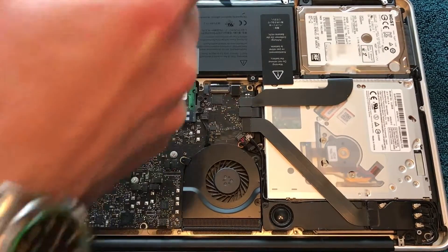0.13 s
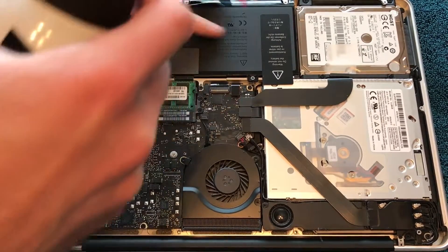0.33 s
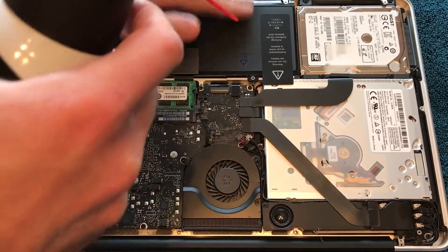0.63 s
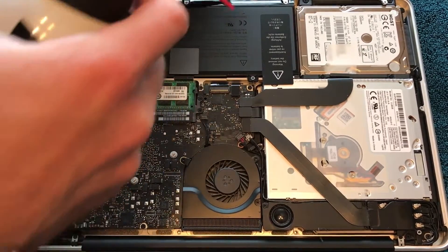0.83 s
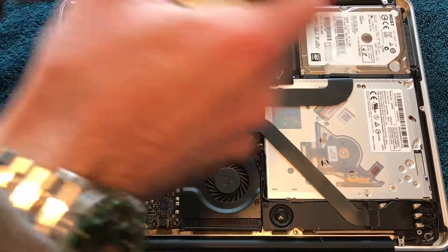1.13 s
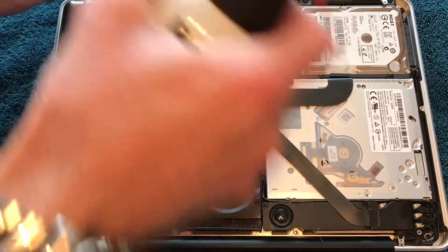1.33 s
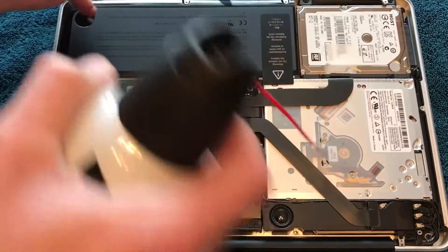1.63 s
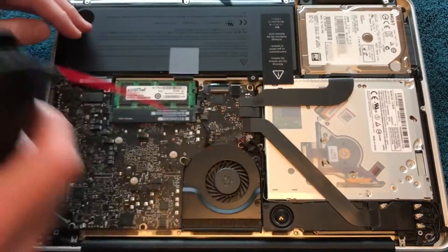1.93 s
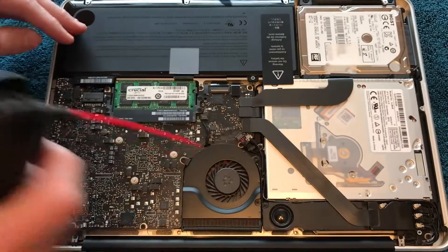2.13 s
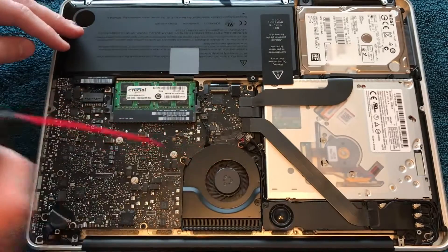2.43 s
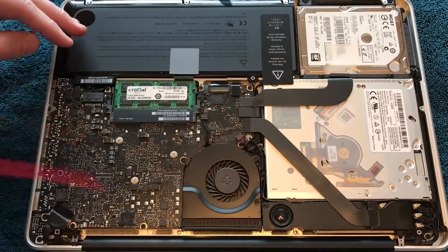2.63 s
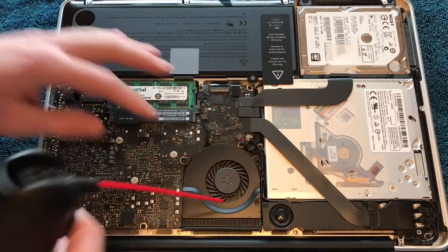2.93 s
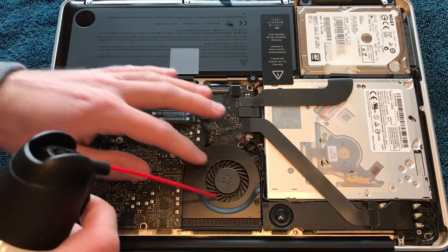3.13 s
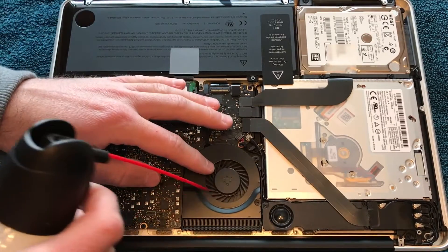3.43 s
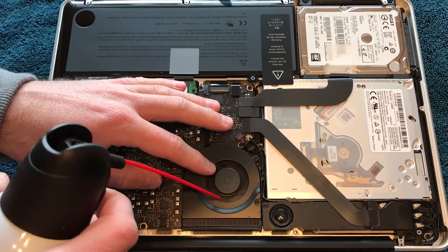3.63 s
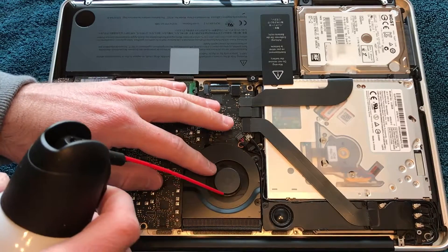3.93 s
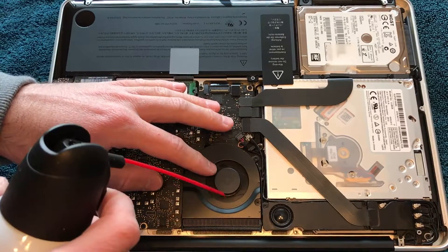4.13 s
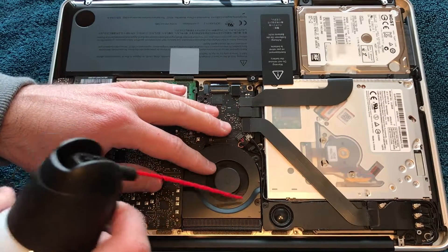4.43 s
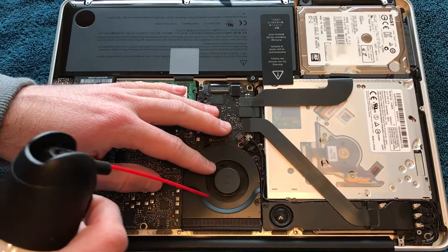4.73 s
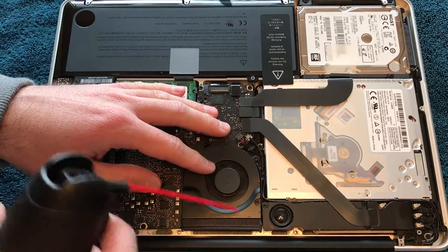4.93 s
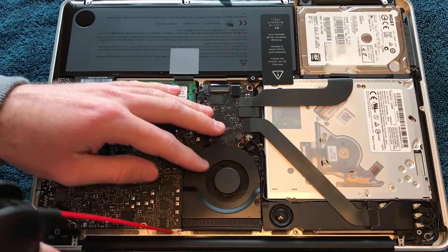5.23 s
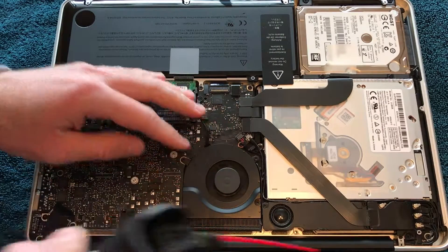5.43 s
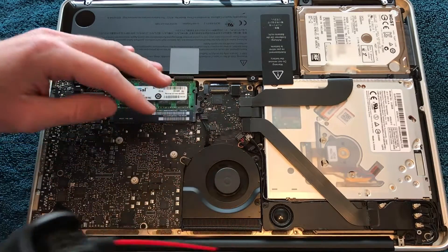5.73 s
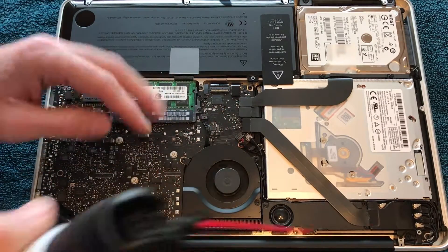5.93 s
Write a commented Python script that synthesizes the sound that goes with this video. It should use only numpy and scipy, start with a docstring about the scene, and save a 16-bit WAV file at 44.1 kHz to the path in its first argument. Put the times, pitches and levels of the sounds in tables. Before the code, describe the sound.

Close mono sound in a quiet room with short, faint echoes. The end of a compressed-air blast cuts off by 0.15 s, leaving low rumble, hum and faint hiss, with a tiny low pop near 0.9 and faint ticks just before 1. From about 1.05 to 2.7 s a rough spray sweeps over an open laptop, its hiss fluttering between hollow roar, splashy edges and high fizz, with quick flaring puffs, brightest around 2.4. After a pause, a smoother, sharper blast runs from 3.2 to 4.25; a short falling chirp comes near 3.5, then a fan whine climbs steeply from 3.6 to 4.2, with tiny pops around 4. A strong short burst at 4.53-4.94 brings back a buzzy, lower whine that dips and rises slightly. The last spray hits at 5.15, weakens around 5.4-5.6, swells again near 5.8 and stops just before 6.

```python
"""Canned air hisses from the tip of a thin straw over an open laptop, close to a mono microphone in a quiet room.
The jet and what it strikes are noise of different colours: low roar in hollows, splash on edges, high fizz.
Flares are puffs of resonant noise, spent air is low lumpy noise, and blips are short falling tones.
Aimed at the fan, the jet spins the blades up into a whine, built from multiples of the blade rate.
Random taps make the room's echo; a low rumble, a hum and a faint hiss remain between blasts."""
import sys
import numpy as np
from scipy import signal
from scipy.io import wavfile
from scipy.ndimage import uniform_filter1d

SR = 44100
rng = np.random.default_rng(int(sys.argv[2]) if len(sys.argv) > 2 else 0)


def digitize_waveform(pressure):
    """Quantize a signal to 16-bit integers and store it at the path in sys.argv[1].

    Rows of a 2-D input are taken as channels; values are limited to [-1, 1].
    """
    field = np.atleast_2d(pressure).T
    bounded = np.clip(field, -1, 1)
    quanta = np.round(bounded * 32767).astype(np.int16)
    wavfile.write(sys.argv[1], SR, quanta)


N = 268039  # length of the sound in samples


def gain_of(db):
    """Turns decibels into a factor for the wave's height."""
    return 10 ** (np.asarray(db) / 20)


def evened(x):
    """Scales a signal to an average (RMS) strength of 1."""
    return x / np.sqrt(np.mean(x ** 2) + 1e-20)


def value_at(points, hz):
    """Reads a table of (pitch, value) at any pitch, with pitch spaced as the ear hears it."""
    pitch_hz, value = np.transpose(points)
    return np.interp(np.log(hz + 1), np.log(pitch_hz + 1), value)


def add(mix, start_s, sound):
    """Adds a short sound to the mix at its start time."""
    part = mix[round(start_s * SR):][:len(sound)]
    part += sound[:len(part)]


def columns(tables):
    """Joins timed tables into smooth curves; also returns a gate that is shut away from every table."""
    t = np.arange(N) / SR
    time_s, *rest = np.transpose(np.concatenate(tables))
    inside = [(t >= rows[0][0] - .005) & (t <= rows[-1][0] + .005) for rows in tables]
    is_open = sum(inside) > 0
    gate = uniform_filter1d(is_open * 1., size=200)
    return [np.interp(t, time_s, column) for column in rest], gate


def resonate(x, hz, width_hz):
    """A resonance of gain 1: shifts the pitch hz down to zero, smooths, and shifts back up."""
    turn = np.exp(2j * np.pi * np.cumsum(hz * np.ones(len(x))) / SR)
    memory = np.exp(-np.pi * width_hz / SR)
    smooth = signal.lfilter([1 - memory], [1, -memory], x / turn)
    return 2 * (turn * smooth).real


def noise(colour, patchy_db, flicker_db, size=512):
    """Turbulence: random short-time spectra with drifting patches and a flicker shared by all pitches."""
    frames = 4 * N // size + 5
    hz = np.fft.rfftfreq(size, 1 / SR)
    a, b, patches = rng.standard_normal((frames, len(hz), 3)).T
    patches = uniform_filter1d(patches, size=6, axis=0)  # smooth over pitch
    patches = evened(uniform_filter1d(patches, size=14, axis=1))  # smooth over time
    flicker = evened(uniform_filter1d(rng.standard_normal(frames), size=3))
    level_db = value_at(colour, hz)[:, None]
    z = (a + 1j * b) * gain_of(level_db + patchy_db * patches + flicker_db * flicker)
    wave = signal.istft(z, nperseg=size, noverlap=3 * size // 4)[1]
    return evened(wave[:N])


def humps(rows, roundness):
    """Adds up the power of rounded swells; returns one gain curve for each level column."""
    start_s, length_s, peak, *levels_db = np.transpose(rows)[:, :, None]
    t = np.arange(0, N, 32) / SR
    peak = np.clip(peak, .1, .9)
    u = (t - start_s) / length_s  # 0 at the start of a swell, 1 at its end
    climb = np.clip(np.minimum(u / peak, (1 - u) / (1 - peak)), 0, 1)
    softness = roundness + 1.4 * length_s  # slower swells have softer edges
    shape = np.sin(np.pi / 2 * climb) ** softness
    power = (gain_of(levels_db) ** 2 * shape ** 2).sum(axis=1)
    return [np.interp(np.arange(N) / SR, t, np.sqrt(p)) for p in power]


def jet():
    """Turbulent air is noise: the free jet at the straw tip and three kinds of surface that it strikes."""
    # colour of the hiss at the tip, the roar in hollows, the splash on edges and the fizz:
    # pitch_hz [Hz], level_db [dB per Hz, relative]
    tip_colour = [(4120, -37.5), (7000, -13.5), (7620, -12.5), (9380, -2.5), (10500, -4), (12700, 0.5),
                  (13700, -2), (15100, 0), (15800, -10.5)]
    hollow_colour = [(60, -79), (250, -37), (550, -22.5), (1000, -6), (1700, 0), (2300, -1.5), (3200, -12)]
    edge_colour = [(500, -63), (1500, -35), (2300, -3), (3000, 0.5), (4000, 0), (5000, -0.5), (6500, -15)]
    fizz_colour = [(1500, -73.5), (3800, -8.5), (5000, -5), (5800, -4.5), (6800, -4.5), (7700, -10.5),
                   (9000, -8.5), (10300, -24.5), (12000, -34.5)]
    # hiss at the straw tip, one table for each press of the trigger: time_s [s], level_db [dB]
    tip_level = [
        [(0.0, -28.5), (0.04, -30), (0.114, -31), (0.148, -59), (0.16, -55)],
        [(0.99, -73), (1.018, -62), (1.062, -45.5), (1.086, -28.5), (1.126, -27), (1.344, -31), (1.374, -25.5),
         (1.428, -34), (1.486, -34), (1.544, -34), (1.638, -26), (1.74, -42), (1.984, -24), (1.998, -28.5),
         (2.106, -25), (2.242, -29), (2.408, -31), (2.506, -30), (2.7, -27), (2.74, -52)],
        [(3.14, -87), (3.154, -71.5), (3.238, -34), (3.294, -35), (3.35, -27.5), (3.526, -22.5), (3.532, -24),
         (3.9, -23.5), (4.058, -23), (4.202, -23.5), (4.25, -55)],
        [(4.47, -65.5), (4.534, -37.5), (4.544, -30), (4.604, -18.5), (4.708, -22), (4.75, -26), (4.86, -22),
         (4.91, -24), (4.938, -46), (4.96, -69)],
        [(5.08, -62), (5.15, -35.5), (5.164, -20.5), (5.186, -17), (5.246, -19.5), (5.32, -19), (5.364, -34),
         (5.496, -44.5), (5.602, -38), (5.696, -24.5), (5.804, -20), (5.862, -27), (5.98, -86)],
    ]
    # what the jet keeps hitting, one row for each press:
    # roar_db, splash_db, fizz_db [dB against the tip hiss]
    aim = [(0.5, -1.5, -2), (-11, -12.5, -6.5), (-18.5, -8, -6), (-24.5, -13, -5), (-26.5, -20, -11)]
    # the straw sweeps over a part of the board: start_s [s], length_s [s],
    # peak_place [0-1 of the length, held to 0.1-0.9], roar_db, splash_db, fizz_db [dB]
    sweeps = [(1.11, 0.041, 0.4, -29.5, -29.5, -29.5), (1.145, .07, 0.6, -37, -50, -28),
              (1.18, 0.11, 0.48, -23, -26.5, -39), (1.24, 0.089, .5, -32, -47, -28.5),
              (1.31, .06, .5, -30.5, -34, -26), (1.34, 0.098, 0.5, -24, -29.5, -37),
              (1.415, 0.12, 0.56, -23, -25.5, -35), (1.5, .09, 0.4, -28, -41, -39.5),
              (1.56, 0.1, 0.27, -20, -27, -30), (1.62, 0.17, 0.3, -21, -24, -35),
              (1.75, 0.089, 0.8, -20, -22.5, -49), (1.83, 0.062, .5, -24.5, -29, -29.5),
              (1.89, 0.13, 0.26, -28, -22.5, -34), (2.01, 0.099, .4, -29, -21, -27),
              (2.06, 0.15, 0.26, -23, -29, -31), (2.13, 0.11, 0.76, -27.5, -21.5, -29),
              (2.22, .09, .5, -30.5, -33.5, -29), (2.295, 0.079, 0.72, -27.5, -15, -26),
              (2.35, 0.095, 0.6, -26.5, -15, -19.5), (2.415, 0.068, .7, -27, -16, -35),
              (2.46, 0.068, 0.4, -31, -27, -32), (2.53, 0.22, 0, -56, -31.5, -37),
              (3.17, 0.23, 0.38, -60.5, -44, -42), (3.3, 0.22, 0.62, -39.5, -29.5, -32.5),
              (3.57, 0.41, 0.23, -32.5, -35, -47), (3.85, 0.41, 0.65, -43.5, -70, -32),
              (4.53, 0.33, 0.44, -40.5, -29.5, -35), (4.75, 0.2, 0.24, -41, -36, -30.5),
              (5.095, 0.086, 0.7, -56, -49.5, -45), (5.13, 0.1, 0.24, -67, -56, -38),
              (5.27, 0.13, 0.43, -34.5, -29.5, -27), (5.33, 0.14, 0.43, -36, -30, -49),
              (5.38, 0.28, 0, -37, -44.5, -57), (5.5, 0.23, 0.78, -34, -38.5, -47),
              (5.6, .19, .5, -37, -26, -32.5), (5.78, .13, 0.71, -35.5, -30, -49)]

    (tip_db,), gate = columns(tip_level)
    later_starts_s = [rows[0][0] for rows in tip_level[1:]]
    press = np.searchsorted(later_starts_s, np.arange(N) / SR)
    steady = gain_of(tip_db + np.array(aim)[press].T)
    # a lower roundness would make the sweeps flatter with quicker edges
    roar, splash, fizz = np.hypot(steady, humps(sweeps, roundness=0.59))
    out = gain_of(tip_db) * noise(tip_colour, patchy_db=2.16, flicker_db=1.0)
    out += roar * noise(hollow_colour, patchy_db=1.3, flicker_db=.8)
    out += splash * noise(edge_colour, patchy_db=1.1, flicker_db=.7)
    out += fizz * noise(fizz_colour, patchy_db=2.0, flicker_db=0.9)
    return gate * out


def flares():
    """The jet crosses an edge or hole and flares: a puff of noise through a steep resonance."""
    # start_s [s], level_db [dB at the height of the puff], pitch_hz [Hz],
    # width_hz [Hz, of each of three passes], rise_s [s]
    flare_rows = [(0.0, -34, 1290, 600, .022), (0.029, -33.5, 3320, 700, .02),
                  (1.001, -64.5, 4100, 1100, 0.03), (1.081, -62.5, 2550, 1510, 0.006),
                  (1.127, -28, 1760, 900, 0.0087), (1.154, -21, 6130, 900, 0.0031),
                  (1.18, -25, 6000, 900, 0.0088), (1.329, -24.5, 6300, 700, 0.012),
                  (1.386, -18, 2100, 930, 0.0089), (1.574, -24, 4150, 500, 0.018),
                  (1.599, -26, 11400, 2200, 0.027), (1.64, -25.5, 4180, 500, 0.023),
                  (1.68, -18.5, 1690, 603, 0.011), (1.81, -23.5, 1584, 695, 0.011),
                  (1.862, -26.5, 14000, 2500, 0.01), (2.08, -22, 10900, 2495, 0.021),
                  (2.118, -42, 713, 494, 0.01), (2.24, -29, 2500, 697, .015),
                  (2.339, -17.5, 3110, 897, 0.0092), (2.385, -15.5, 5320, 701, 0.012),
                  (2.446, -18.5, 2620, 890, 0.014), (3.485, -44.5, 3370, 1500, 0.0053),
                  (4.543, -27, 5950, 2000, 0.016), (5.168, -32, 6140, 720, 0.017),
                  (5.331, -32.5, 3950, 402, 0.021), (5.314, -25.5, 5720, 1200, 0.02),
                  (5.6, -42, 870, 503, .05), (5.68, -28.5, 5350, 1500, 0.028)]
    out = np.zeros(N)
    puffs = rng.standard_normal((len(flare_rows), SR // 4))
    for (start_s, level_db, pitch_hz, width_hz, rise_s), puff in zip(flare_rows, puffs):
        u = np.arange(len(puff)) / SR / rise_s
        for _ in range(3):
            puff = resonate(puff, pitch_hz, width_hz)
        swell = u * np.exp(1 - u)  # reaches 1 after the rise time, then dies away
        add(out, start_s, gain_of(level_db) * evened(puff) * swell)
    return out


def buffet():
    """Spent air buffets across the case: low lumpy noise in gusts."""
    # start_s [s], length_s [s], peak_place [0-1 of the length, held to 0.1-0.9], level_db [dB]
    gusts = [(-.1, .25, 0.7, -47.5), (1.06, 0.2, 0.45, -46), (1.255, 0.11, 0.34, -45.5),
             (1.37, 1.2, 0, -50.5), (2.07, 0.091, 0.7, -48), (2.18, .42, .5, -55.5), (3.2, 1.06, 0.21, -59),
             (4.54, 0.45, .4, -61.5), (5.26, 0.62, 0.43, -52.5), (5.84, 0.088, .5, -54.5)]
    # colour of the gusts: pitch_hz [Hz], level_db [dB per Hz, relative]
    buffet_colour = [(50, -33.5), (120, -15), (300, -7.5), (550, -5), (900, -5), (1500, -33)]
    level = humps(gusts, roundness=0.26)[0]
    return level * noise(buffet_colour, patchy_db=1.5, flicker_db=0.0, size=1024)


def background():
    """Low rumble, hum from noise in narrow resonances that make it waver, and a faint hiss."""
    # colour of the rumble, then of the faint hiss: pitch_hz [Hz], level_db [dB per Hz, relative]
    rumble_colour = [(12, -39.5), (20, -5.5), (111, -12.5), (181, -4), (431, -10), (507, -15), (700, -18.5),
                     (775, -21.5), (840, -21.5), (2500, -33), (3250, -46), (5500, -120)]
    hiss_colour = [(530, -20), (900, -9), (1010, -23.5), (1120, -12), (1470, -8), (1560, -17), (2950, -12),
                   (15800, -16)]
    # lines of the hum: pitch_hz [Hz], level_db [dB]
    hum_lines = [(59.2, -77.5), (123.8, -80), (166.9, -73), (209.9, -72.5), (419.9, -89.5), (581.4, -85.5)]
    # spells of stronger faint hiss, mostly between blasts: start_s [s], end_s [s], level_db [dB]
    hiss_spells = [(.1, 0.398, -66), (0.391, 0.537, -64), (0.716, 0.76, -66.5), (2.7, 3.125, -66),
                   (4.306, 4.599, -63), (4.904, 5.1, -68), (5.9, 6.098, -65)]

    rumble = gain_of(-68.5) * noise(rumble_colour, patchy_db=2.5, flicker_db=0, size=4096)
    hum = np.zeros(N)
    for pitch_hz, level_db in hum_lines:
        hum += gain_of(level_db) * evened(resonate(rng.standard_normal(N), pitch_hz, width_hz=5.1))
    t = np.arange(N) / SR
    spells = np.zeros(N)
    for start_s, end_s, level_db in hiss_spells:
        fade = np.clip(np.minimum(t - start_s, end_s - t) / .008, 0, 1)  # 8 ms at each end
        spells += gain_of(level_db) * fade
    hiss_level = np.hypot(spells, gain_of(-76.5))  # the hiss never falls silent
    hiss = hiss_level * noise(hiss_colour, patchy_db=0.0, flicker_db=.6)
    return rumble + hum + hiss


def room(x):
    """Echoes of the room: sparse taps of random sign, with each pitch dying at its own speed."""
    # time to die away by 60 dB: pitch_hz [Hz], decay_s [s]
    room_decay = [(200, 1), (1000, 0.44), (4000, 0.31), (12000, 0.23)]
    taps = np.zeros(SR // 2)
    at = np.arange(300, SR // 2 - 20, 20)
    taps[at + rng.integers(0, 20, len(at))] = rng.choice([-1., 1.], len(at))
    hz, t, z = signal.stft(taps, SR, nperseg=256)
    fading = gain_of(-60 * t / value_at(room_decay, hz)[:, None])
    tail = signal.istft(z * fading, SR, nperseg=256)[1]
    return signal.fftconvolve(x, tail / np.linalg.norm(tail))[:N]


def blips():
    """Falling blips, pops and faint low tones: sine waves whose pitch slides down as they swell and fade."""
    # start_s [s], peak_db [dB], start_hz [Hz], end_hz [Hz], length_s [s],
    # bend [no unit: 1 an even fall, under 1 an early fall, over 1 a late fall]
    blip_rows = [(0.91, -51.5, 130, 35.2, 0.018, 0.6), (.974, -65, 4300, 4030, 0.0053, 1.),
                 (.979, -68, 1900, 1690, .008, 0.98), (3.514, -31, 1820, 610, 0.009, 0.97),
                 (3.574, -30, 1616, 701, 0.069, 0.79), (3.968, -41.5, 1500, 35.1, 0.019, 0.35),
                 (4.01, -39.5, 1800, 35, 0.024, 0.37), (4.07, -41.5, 1600, 35, 0.019, 0.38),
                 (4.091, -42, 1500, 34.7, 0.013, 0.48), (4.97, -58, 218, 210, 0.18, 2.2),
                 (5.06, -66, 397, 350, .11, 2.)]
    out = np.zeros(N)
    for start_s, peak_db, start_hz, end_hz, length_s, bend in blip_rows:
        u = np.linspace(0, 1, round(length_s * SR))
        pitch_hz = start_hz * (end_hz / start_hz) ** u ** bend
        turns = np.cumsum(pitch_hz) / SR
        swell = np.sin(np.pi * u ** (0.51 * bend))  # an early fall also peaks early
        add(out, start_s, gain_of(peak_db) * swell * np.sin(2 * np.pi * turns))
    return out


def fan(count=10):
    """Fan blades chop the jet: multiples of the blade rate, which turbulence makes waver in level and pitch."""
    # one table: time_s [s], blade_hz [Hz], tone_db (blade tone), octave_db (twice the rate),
    # higher_db (higher multiples, before the colour below) [dB]
    fan_tables = [
        [(3.61, 152.6, -53, -67, -46), (3.64, 249.8, -45.5, -44, -47.5), (3.676, 378.6, -45, -43, -39),
         (3.71, 474, -42.5, -47, -39.5), (3.761, 583, -39.5, -31.5, -31.5), (3.81, 670.5, -35, -30.5, -34),
         (3.865, 811, -33.5, -31, -34.5), (3.91, 938, -38.5, -41, -38.5), (3.953, 1060, -28, -30.5, -31),
         (3.995, 1260, -38.5, -41, -38), (4.03, 1446, -42.5, -57, -43), (4.075, 1688, -40, -52, -31),
         (4.095, 1768, -40, -28, -30), (4.118, 1825, -29, -44, -20), (4.16, 1928, -24.5, -40, -50),
         (4.2, 2010, -28.5, -28.5, -52.5), (4.23, 2020, -57, -64.5, -81.5), (4.3, 1990, -61, -80, -99),
         (4.38, 1910, -67, -95, -99), (4.44, 1782, -79, -99, -99), (4.53, 1582, -83.5, -85.5, -90),
         (4.585, 1538, -47, -33, -62.5), (4.605, 1507, -37, -25, -17), (4.68, 1489, -39.5, -24.5, -26.5),
         (4.712, 1463, -46, -33, -54), (4.73, 1435, -45, -53, -65), (4.76, 1402, -51, -60, -70),
         (4.78, 1346, -50, -32, -63), (4.805, 1352, -28.5, -28, -24.5), (4.86, 1395, -32, -33, -27.5),
         (4.89, 1435, -34, -37.5, -56), (4.93, 1420, -57, -81, -80.5), (5.1, 1373, -82.5, -90, -99)],
    ]
    # colour that the housing gives the higher multiples: pitch_hz [Hz], change_db [dB]
    housing_colour = [(500, 0), (1500, -2.5), (2400, -5.5), (3200, 0), (4200, -0.5), (4800, -6),
                      (5500, -8.5), (7000, -31)]

    (blade_hz, tone_db, octave_db, higher_db), gate = columns(fan_tables)
    levels_db = [tone_db, octave_db]
    for multiple in range(3, count + 1):
        levels_db.append(higher_db + value_at(housing_colour, multiple * blade_hz))
    pitch_waver = evened(uniform_filter1d(rng.standard_normal(N), size=400))
    turns = np.cumsum(blade_hz * (1 + .002 * pitch_waver)) / SR
    wavers = uniform_filter1d(uniform_filter1d(rng.standard_normal((count, N)), size=450), size=450)
    out = np.zeros(N)
    for k, (level_db, waver) in enumerate(zip(levels_db, wavers)):
        waver_db = min(1.5 + .5 * k, 2.5)  # higher multiples waver more, up to a limit
        gain = np.sqrt(2) * gain_of(level_db + waver_db * evened(waver))
        out += gain * np.sin(2 * np.pi * (k + 1) * turns)
    return gate * out


def scene():
    """Sums the direct sounds, their echo in the room and the background, alike in both channels."""
    air = jet() + flares() + buffet()
    tones = fan() + blips()
    echo = room(gain_of(-15) * air + gain_of(-21) * tones)
    mono = air + tones + echo + background()
    return np.array([mono, mono])


def record(dry):
    """The microphone colours the sound, loud peaks flatten softly, and a filter limits the treble."""
    # dips from the microphone's housing: pitch_hz [Hz], change_db [dB]
    microphone = [(4000, -2), (5000, -5.5), (5800, -1.5), (7500, -2), (9000, -2), (10400, -4),
                  (12000, -1.5)]
    hz = np.linspace(0, SR / 2, 257)
    colour = signal.firwin2(255, hz, gain_of(value_at(microphone, hz)), fs=SR)
    coloured = signal.oaconvolve(dry, colour[None], "same")
    flattened = np.tanh(coloured)
    band_limit = signal.firwin(1023, 15870, window=("kaiser", 9), fs=SR)  # top of the band in Hz
    return signal.oaconvolve(flattened, band_limit[None], "same")


dry = scene()
out = record(dry)
digitize_waveform(out)
```